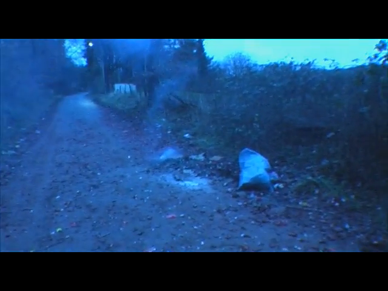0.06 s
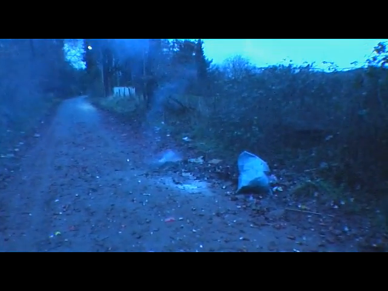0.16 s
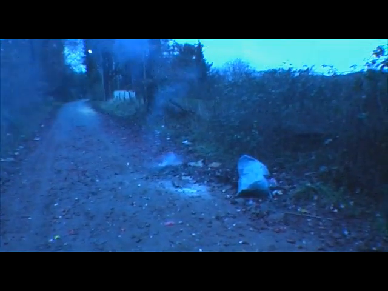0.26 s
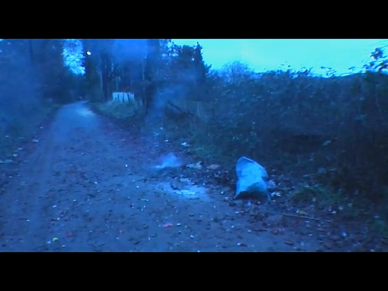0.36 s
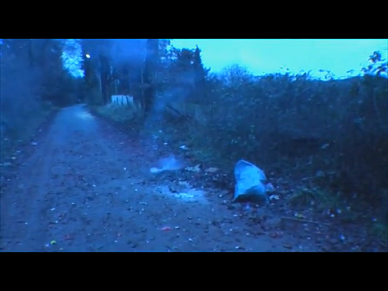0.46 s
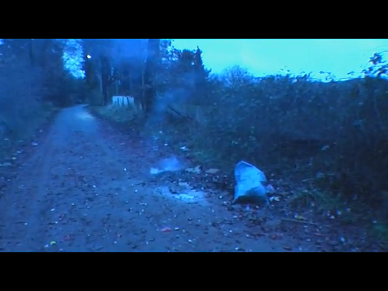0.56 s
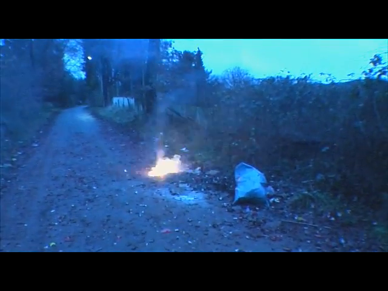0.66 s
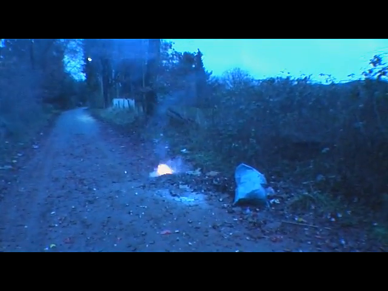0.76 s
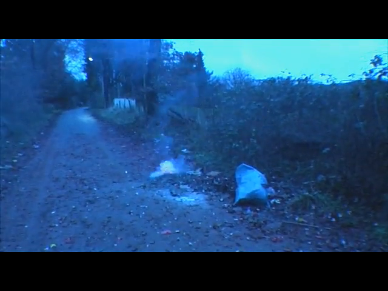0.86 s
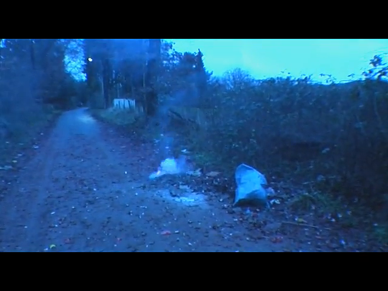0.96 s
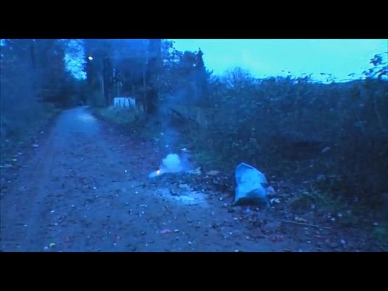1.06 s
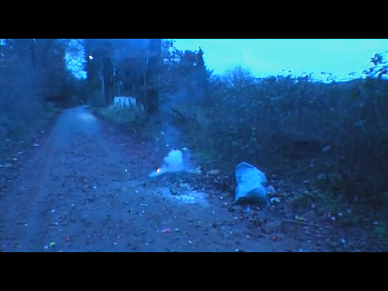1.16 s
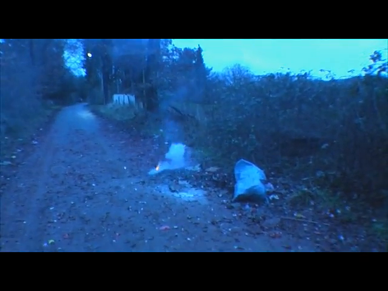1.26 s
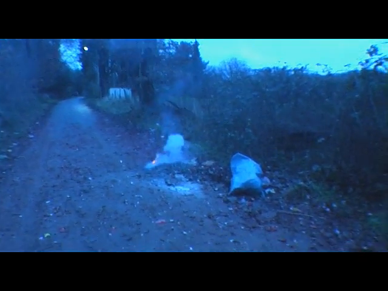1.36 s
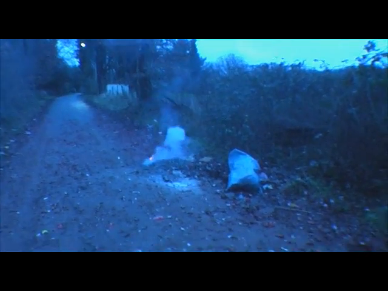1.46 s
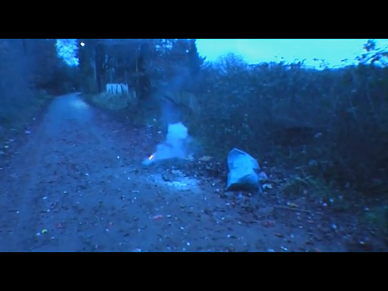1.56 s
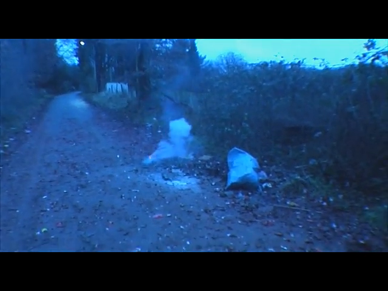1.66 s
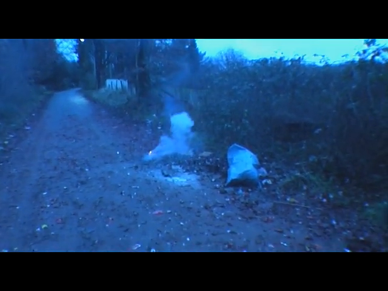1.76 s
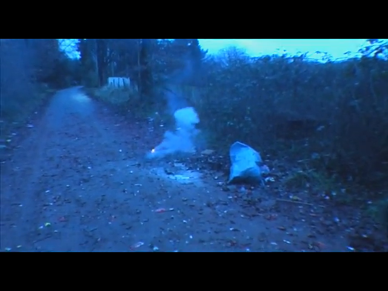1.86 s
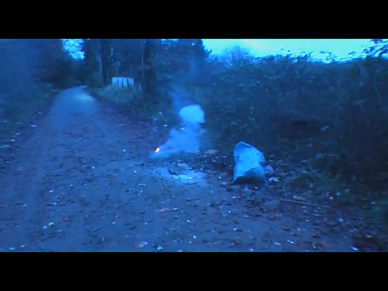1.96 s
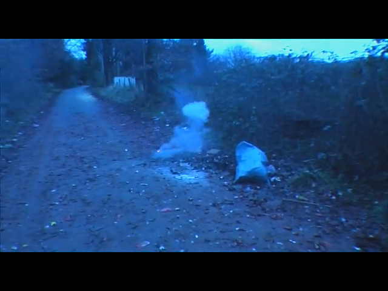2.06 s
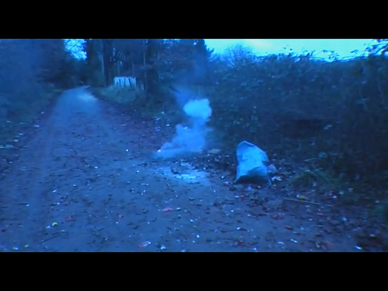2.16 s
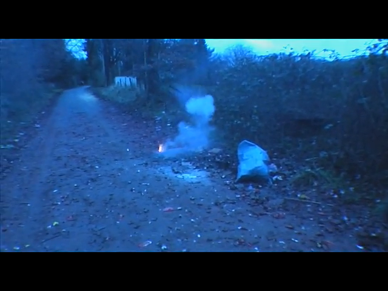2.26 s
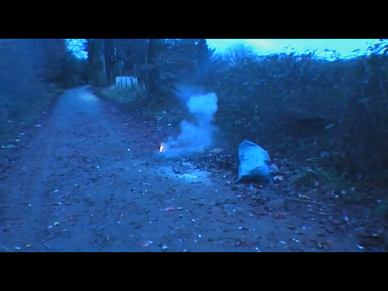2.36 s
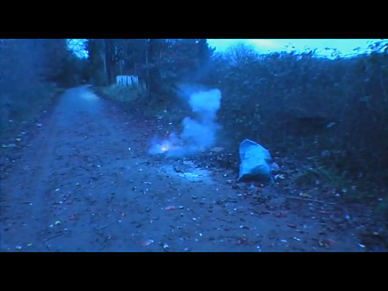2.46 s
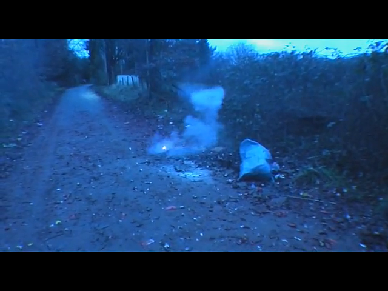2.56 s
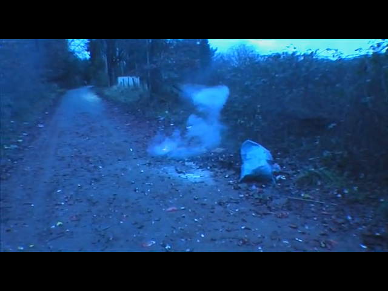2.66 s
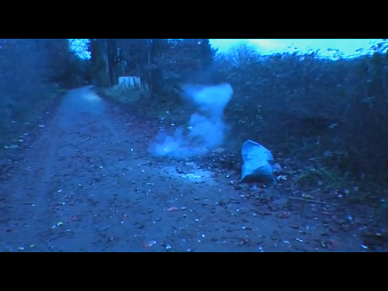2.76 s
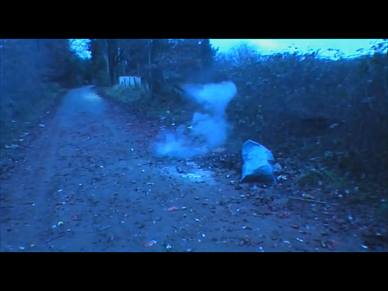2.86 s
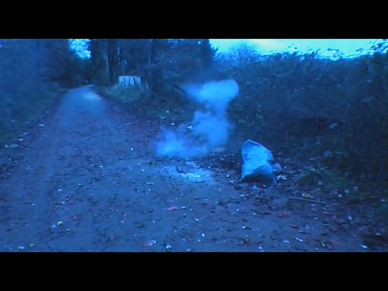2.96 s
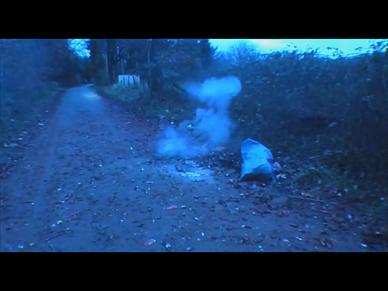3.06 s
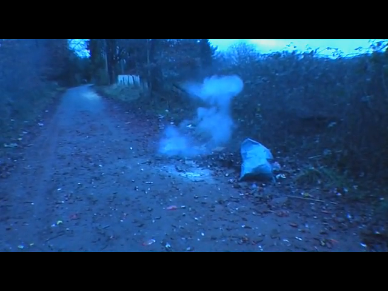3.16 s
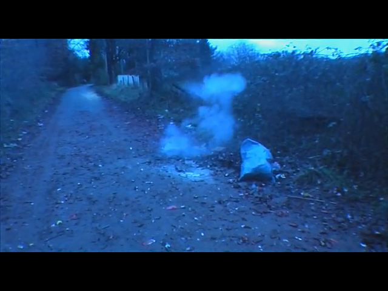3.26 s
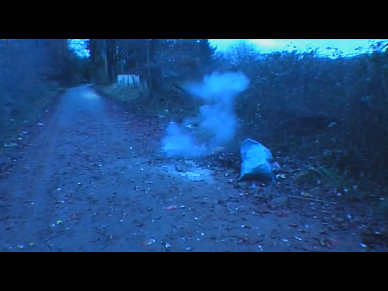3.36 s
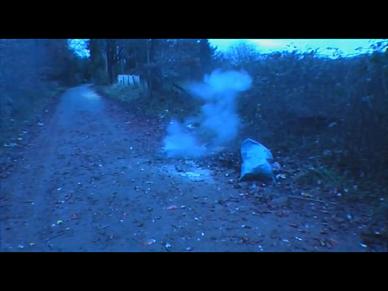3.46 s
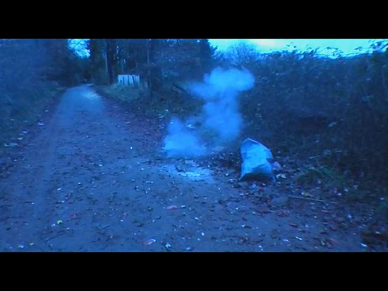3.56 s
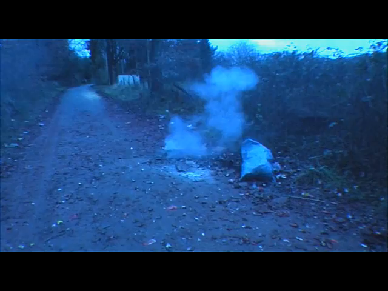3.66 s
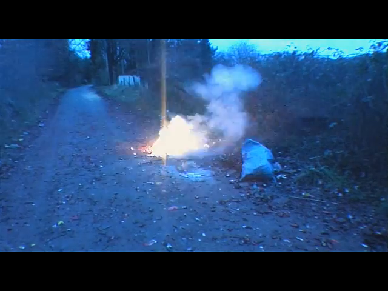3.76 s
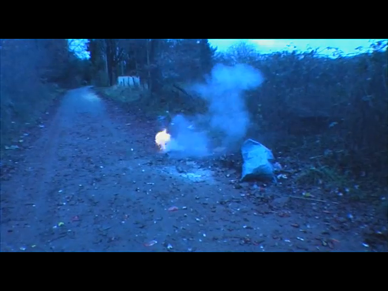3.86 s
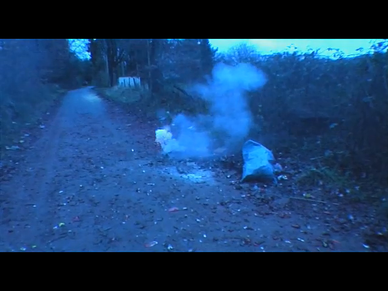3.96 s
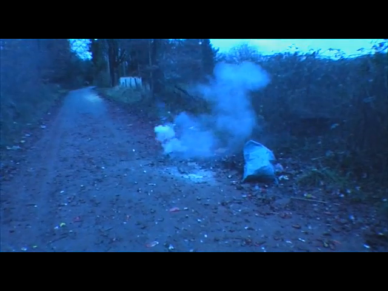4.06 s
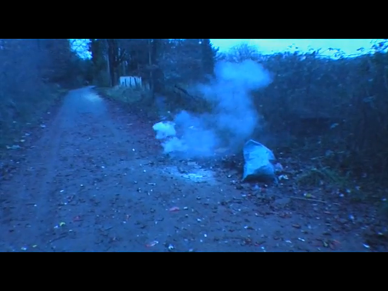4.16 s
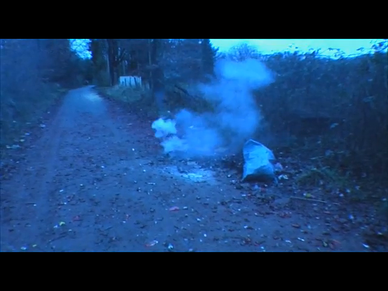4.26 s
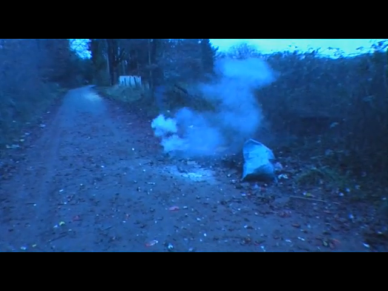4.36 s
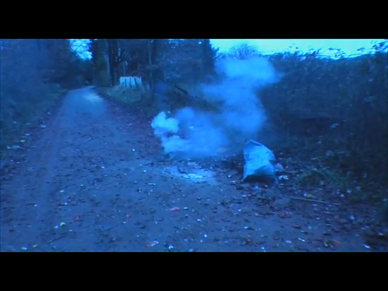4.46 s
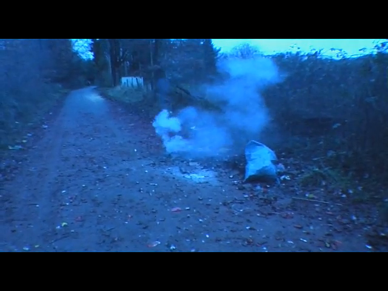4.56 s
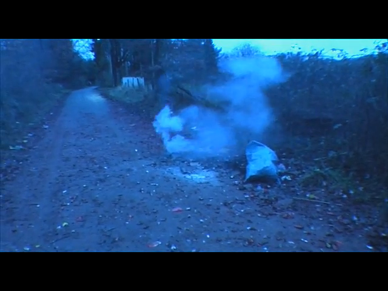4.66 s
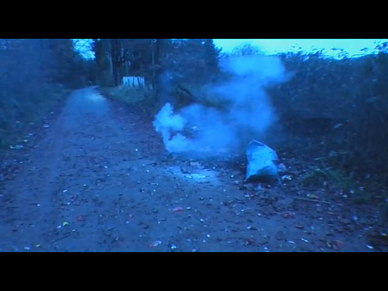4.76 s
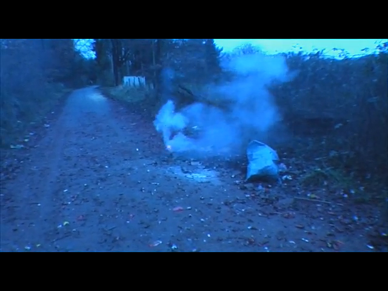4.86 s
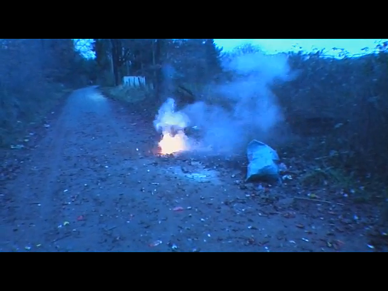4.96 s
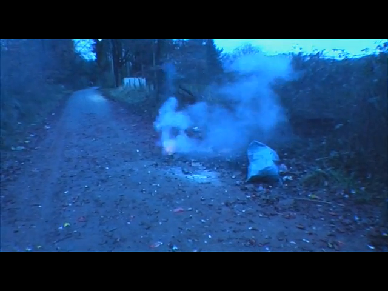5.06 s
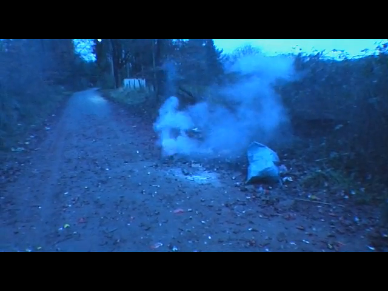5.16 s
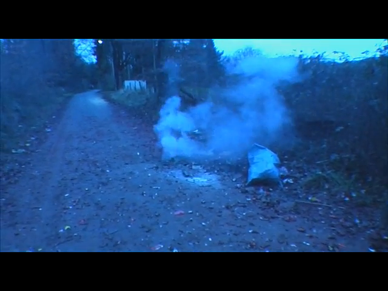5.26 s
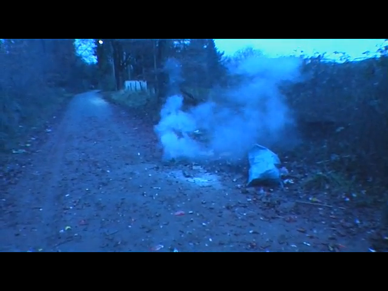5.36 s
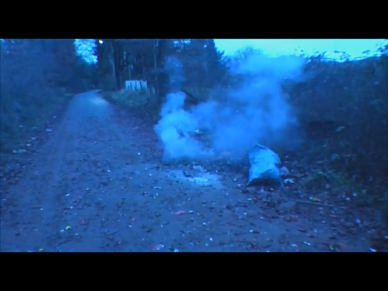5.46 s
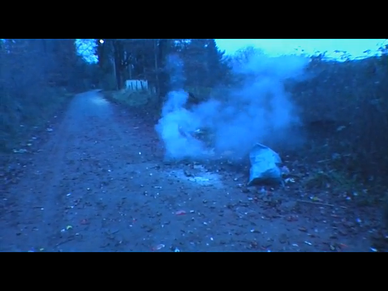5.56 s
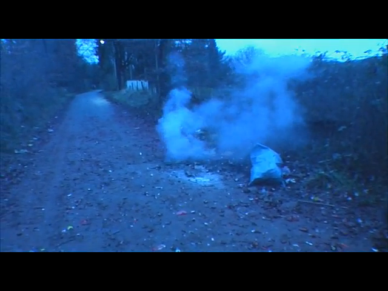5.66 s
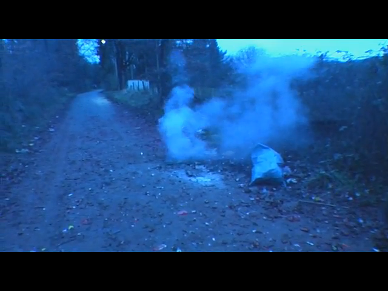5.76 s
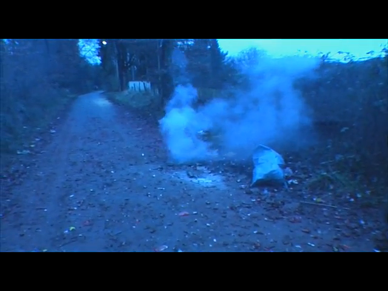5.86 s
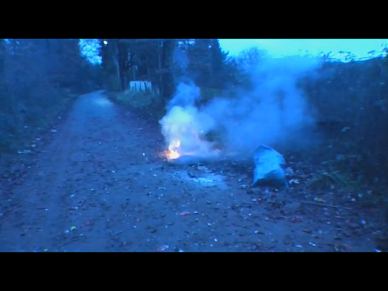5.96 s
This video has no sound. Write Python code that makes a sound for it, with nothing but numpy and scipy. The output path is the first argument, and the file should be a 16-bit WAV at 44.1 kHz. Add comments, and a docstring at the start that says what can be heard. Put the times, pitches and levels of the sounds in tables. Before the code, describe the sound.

A ground firecracker fizzes and pops on a gravel path, going off in four sharp overloaded bangs, each answered by a fading hiss from the trees.

```python
"""A gravel path between trees, where a ground firecracker goes off four times a few metres away.
Each blast is a volley of tiny shocks with a sharp front and a falling thump, and it overloads the input.
Trunks and bushes send it back as a hiss of random clicks that dulls as it fades, with a few distinct returns.
The fuse fizzes as flickering grit, with spits (softer volleys) and pops (short dull pulses).
Behind it all lies a far wash over low wind, made of coloured noise."""
import sys
import numpy as np
from scipy import signal
from scipy.fft import rfft, irfft
from scipy.io import wavfile
from scipy.ndimage import uniform_filter1d

SR = 44100
rng = np.random.default_rng(int(sys.argv[2]) if len(sys.argv) > 2 else 0)


def master_out(mix):
    """Clip the mix to full scale and print it as 16-bit PCM to the path in sys.argv[1]."""
    frames = np.transpose(np.atleast_2d(mix))
    ceiling = np.clip(frames, -1, 1)
    pcm = np.round(ceiling * 32767).astype(np.int16)
    wavfile.write(sys.argv[1], SR, pcm)


N = 265482  # length of the scene [samples]


def amp(db):
    """Turn decibels into an amplitude factor."""
    return 10 ** (np.asarray(db) / 20)


def evened(x):
    """Scale a signal to an rms of 1."""
    return x / np.sqrt(np.mean(x ** 2) + 1e-20)


def read(points, hz):
    """Read a table of (frequency, value) at any frequency, along a logarithmic scale."""
    f, value = np.transpose(points)
    return np.interp(np.log(hz + 1), np.log(f + 1), value)


def add(mix, start_s, sound):
    """Lay a sound into the mix from its start time, cut off at the end of the scene."""
    part = mix[..., round(start_s * SR):][..., :sound.shape[-1]]
    part += sound[..., :part.shape[-1]]


def pair(common, opposite, side_table):
    """Two microphone ports hear one common signal plus an opposite share of another."""
    hz = np.fft.rfftfreq(len(common), 1 / SR)
    mid = rfft(common)
    side = rfft(opposite) * amp(read(side_table, hz))
    return irfft([mid + side, mid - side], len(common))


def colour(x, points, dull_db=0., bass_db=0., bounce_ms=0., share=0.):
    """Shape the spectrum, tilt it about 1 kHz, lift the bass and add the comb of a bounce off the ground."""
    hz = np.fft.rfftfreq(x.shape[-1], 1 / SR)
    tilt_db = -dull_db * np.log2((hz + 50) / 1000)
    shelf_db = bass_db / (1 + (hz / 380) ** 4)
    gain = amp(read(points, hz) + tilt_db + shelf_db)
    bounce = 1 + share * np.exp(-2j * np.pi * hz * bounce_ms / 1000)  # a delayed, weaker copy
    return evened(irfft(rfft(x) * gain * bounce, x.shape[-1]))


def grit(count, per_s, spread_db):
    """Sparse clicks of random sign, a few of them large."""
    where, sign, size = rng.random((count, 3)).T
    clicks = where < per_s / SR
    return clicks * np.sign(sign - .5) * amp(-spread_db * np.log(1 - .995 * size))


def drift(count, low_hz, top_hz):
    """Random wavering of rms 1: a sum of sines between two rates, the slower ones stronger."""
    t = np.arange(count) / SR
    waver = 0
    for f in np.geomspace(low_hz, top_hz, num=24):
        waver = waver + np.sin(2 * np.pi * (f * t + rng.random())) / np.sqrt(f)
    return evened(waver)


LEAD_DB, LEAD_S = -22.5, 0.0035  # a faint quick swell leads into every burst


def burst(row, points, side_table, per_s, spread_db):
    """A volley of small shocks that swells after a faint lead-in, holds and dies; the treble swells later."""
    s, db, rise, hold, t60, dull_db, bass_db = row
    before = .02  # room for the lead-in [s]
    t = np.arange(8192) / SR - before
    swell = np.clip(t / rise, 0, 1)
    fall = amp(-60 * np.maximum(t - rise - hold, 0) / t60)
    lead = amp(LEAD_DB) * np.exp(np.minimum(t, 0) / LEAD_S)
    volley = pair(grit(len(t), per_s, spread_db), grit(len(t), per_s, spread_db), side_table)
    volley = colour(volley, points, dull_db, bass_db)
    low = signal.sosfiltfilt(signal.butter(2, 1600, fs=SR, output="sos"), volley)
    treble = volley - low
    return s - before, amp(db) * fall * (swell ** 1.15 * low + swell ** 8.2 * treble + lead * volley)


def snap(row, cycles, crack_db):
    """A short dull pulse, a sine dying within a few cycles, with a trace of noisy crack on its front."""
    s, db, hz = row
    t = np.arange(600) / SR
    body = np.sin(2 * np.pi * hz * t) * np.exp(-t * hz / cycles) * np.clip(t * hz, 0, 1)
    crack = uniform_filter1d(rng.standard_normal((2, len(t))), size=6) * np.exp(-t / 0.0013)
    return s, amp(db) * (body + amp(crack_db) * crack)


# Spectrum of the far wash and low wind: (frequency [Hz], relative level [dB per Hz])
WASH_COLOUR = [(12, -39), (20, -14), (60, 0), (112, -5), (140, -14.5), (365, -19), (408, -12), (522, -19),
               (599, -9.5), (787, -11.5), (879, -10), (2420, -27), (3650, -31), (7870, -31.5),
               (14000, -44.5)]
WASH_DB = -46.5  # level about which the wash swells [dB]
# Width of the wash, the fuse and its spits: (frequency [Hz], side minus mid [dB])
SIDE_NEAR = [(60, -58), (150, -22), (380, -11), (950, -15), (2370, -7.5), (5950, -13.5), (14900, -1)]


def wash():
    """Far wash over low wind: coloured noise, swelling slowly."""
    air = pair(*rng.standard_normal((N, 2)).T, SIDE_NEAR)
    swelling_db = WASH_DB + 2.1 * drift(N, 0.177, 4.3)
    return amp(swelling_db) * colour(air, WASH_COLOUR)


# Level of the fuse's fizz, before its flicker: (time [s], level [dB])
FUSE_LEVEL = [(0, -58), (.2, -69), (.3, -59), (.44, -55.5), (.57, -48.5), (.64, -53), (.71, -46.5),
              (1.15, -52.5), (1.24, -48), (1.38, -44.5), (1.42, -49), (2.25, -53.5), (2.42, -43.5),
              (2.9, -52.5), (3.649, -54.5), (3.82, -47.5), (4.45, -49.5), (4.93, -54), (4.98, -45.5),
              (5.45, -58), (5.56, -51), (5.98, -49.5), (6.02, -41)]
# Spectrum of the fizz: (frequency [Hz], relative level [dB per Hz])
FUSE_COLOUR = [(1180, -10), (2000, 2.5), (3100, -4.5), (3370, -2.5), (3960, -2), (4200, -2.5), (5100, -1),
               (5530, -3.5), (8110, -2.5), (8800, -8), (10100, -18), (11900, -19.5), (13000, -28),
               (14000, -57)]
# Where the fuse burns between jumps:
# (start time [s], ground bounce delay [ms], bounce share [amplitude ratio], dullness [dB per octave])
FUSE_SPOTS = [(0, 0.68, 0.28, 1), (.75, 0.72, 0.11, -2), (2.5, 0.67, 0.075, 2), (3.86, 0.236, 0.27, 3),
              (5.01, 1.21, 0.24, 3)]


def fuse():
    """Fine grit of burning powder, flickering; its colour changes when the cracker jumps."""
    s, db = np.transpose(FUSE_LEVEL)
    t = np.arange(N) / SR
    fizz = pair(grit(N, 8000, 3.1), grit(N, 9000, 0.6), SIDE_NEAR)
    spot = np.searchsorted([row[0] for row in FUSE_SPOTS[1:]], t)  # which spot it burns at, moment by moment
    heard = 0
    for k, (_, ms, share, dull_db) in enumerate(FUSE_SPOTS):
        heard = heard + (spot == k) * colour(fizz, FUSE_COLOUR, dull_db, bounce_ms=ms, share=share)
    flickering_db = np.interp(t, s, db) + 1.64 * drift(N, 8, 60)
    return amp(flickering_db) * heard


# Spits of the fuse: (time [s], level [dB], rise [s], hold [s], time to fall 60 dB [s],
# dullness [dB per octave], bass lift [dB])
SPITS = [(0.222, -44, 0.0054, 0.01, 0.24, 1.5, 6), (0.459, -33.5, 0.0037, 0.027, 0.12, 2.5, -1),
         (0.497, -32, 0.0059, 0.016, 0.15, 3.5, -2.5), (2.291, -26, 0.002, 0.0073, 0.16, 4, 4),
         (2.416, -32, 0.028, 0.072, .05, 0.5, 10)]
# Spectrum of a spit: (frequency [Hz], relative level [dB per Hz])
SPIT_COLOUR = [(59, -31), (100, -2.5), (209, -13), (303, -6.5), (1170, 3), (1440, 0), (1600, 0.5),
               (2360, -5.5), (7760, 1), (12400, -12.5), (13500, -11)]


def spits(mix):
    """The fuse spits: volleys of dense grit, all of nearly even size."""
    for row in SPITS:
        add(mix, *burst(row, SPIT_COLOUR, SIDE_NEAR, per_s=12000, spread_db=0.5))


# Small pops of the fuse: (time [s], level before the pulse dies away [dB], pitch [Hz])
POPS = [(0.193, -36, 883), (0.34, -16, 1300), (0.5204, -3, 840), (2.299, -8.5, 700), (3.653, -35, 851),
        (5.654, -13, 1040), (5.958, -19.5, 855)]


def pops(mix):
    """The fuse pops: dull pulses that die in a cycle or so."""
    for row in POPS:
        add(mix, *snap(row, cycles=0.63, crack_db=-27))


NEAR_S = 0.25  # the excess of the near returns dies away over this time [s]


def returned_db(late, db, fall_db, near_db):
    """Level of the scattered sound, late seconds after the bang: a steady fall plus near returns."""
    return db - fall_db * late + near_db * np.exp(-late / NEAR_S)


# Sound coming back from the trees after each bang, and the bounce where the cracker lay:
# (bang time [s], level [dB], fall [dB per s], excess of near returns [dB], ground bounce delay [ms],
# bounce share [amplitude ratio], dullness [dB per octave], bass lift [dB], factor on path loss [ratio])
SCATTER = [(.728, -18, 31, 3, 0.66, 0.026, 1, -10.5, 0.86),
           (2.484, -21, 60, 2, 1.03, 0.05, -0.93, 3.5, 0.81),
           (3.838, -19.5, 29, 2.5, 0.91, 0.02, 0.5, -9, 0.86),
           (4.992, -21.5, 42.5, 7.5, 1.62, .35, 0.05, 1.5, 0.92)]
# Spectrum of the returns: (frequency [Hz], relative level [dB per Hz])
SCATTER_COLOUR = [(35, -25), (60, -11), (381, -7), (457, -6), (808, -6), (1110, -5), (1500, -6),
                  (1680, -7.5), (2010, -9.5), (2420, -12.5), (6750, -16), (13100, -34), (14000, -55)]
# Air and leaves swallow the treble on long paths: (frequency [Hz], extra loss before the factor [dB per s])
PATH_LOSS = [(80, -6), (250, 5), (1000, 1), (2700, 14.5), (5400, 44.5), (8000, 56), (11000, 85),
             (13500, 210)]
# Lean of the returns to one side: (frequency [Hz], left minus right [dB])
TREES_BALANCE = [(60, 24), (180, 4.5), (550, -2), (1640, -1), (4950, 1.5), (14900, -2)]
# Width of the returns: (frequency [Hz], side minus mid [dB])
SIDE_TREES = [(60, -27), (110, -33), (200, -39), (380, -21), (700, -21.5), (1290, -14), (2370, -7),
              (4380, -10.5), (8080, -4), (11500, 1), (14900, -14)]
# Groups of large trunks that answer every bang:
# (delay [s], swell of the scatter [dB], single return over the scatter [dB], pitch of that return [Hz])
TRUNKS = [(.058, -1.5, 12.5, 1116), (.089, 3, 2, 866), (.116, 2, 7.5, 794), (0.187, 1, 2, 1360),
          (.283, 3, 8, 1480), (.413, 4, 7.5, 775), (.465, 3, 9, 715), (.497, -4, 9, 950),
          (.745, 3.5, 8.5, 860)]
TRUNKS_SPREAD_S = 0.0082  # how far a group's swell spreads either side of its delay [s]
FIRST_RETURN_S, SWELL_S = .022, 0.014  # the nearest bushes answer first [s]
SCATTER_S = 1.1  # length of the returns [s]
HOP = 64  # step of the time-frequency grid [samples]


def scatter(row):
    """Thousands of trunks and bushes return the blast as clicks; the later, the duller."""
    s, db, fall_db, near_db, bounce_ms, share, dull_db, bass_db, loss = row
    t = FIRST_RETURN_S + np.arange(0, SCATTER_S, 1 / SR)  # time since the bang
    returns = pair(grit(len(t), 12000, 1.3), grit(len(t), 12000, 1.3), SIDE_TREES)
    returns = colour(returns, SCATTER_COLOUR, dull_db, bass_db, bounce_ms, share)
    hz, late, z = signal.stft(returns, SR, nperseg=4 * HOP, noverlap=3 * HOP)
    side_db = read(TREES_BALANCE, hz)[:, None] * np.array([.5, -.5])[:, None, None]

    # groups of trunks, each with its own colour
    patches = rng.standard_normal((len(late), len(hz))).T
    patches = uniform_filter1d(patches, size=2, axis=0)
    patches_db = 1.44 * evened(uniform_filter1d(patches, size=120, axis=1))

    path_db = -loss * read(PATH_LOSS, hz)[:, None] * (late - 0.0759)
    z = z * amp(side_db + patches_db + path_db)
    dulled = signal.istft(z, SR, nperseg=4 * HOP, noverlap=3 * HOP)[1][:, :len(t)]

    clumps_db = 0.85 * drift(len(t), 13.84, 60.36)
    for delay, swell_db, _, _ in TRUNKS:
        clumps_db = clumps_db + swell_db * np.exp(-((t - delay) / TRUNKS_SPREAD_S) ** 2)
    fade = np.clip((t - t[0]) / SWELL_S, 0, 1) * np.clip((t[-1] - t) / 0.088, 0, 1)
    return s + t[0], amp(returned_db(t, db, fall_db, near_db) + clumps_db) * fade * dulled


def echoes(row):
    """Each group of large trunks sends one distinct return: rows of (time, level, pitch) for a snap."""
    rows = []
    for delay, _, over_db, hz in TRUNKS:
        rows.append((row[0] + delay, returned_db(delay, *row[1:4]) + over_db, hz))
    return rows


def trees(mix):
    """The trees answer each bang with a scattered hiss and a few distinct returns."""
    for row in SCATTER:
        add(mix, *scatter(row))
        for echo in echoes(row):
            add(mix, *snap(echo, cycles=3.2, crack_db=-36.5))


# Falling thump after each blast: (time [s], starting level [dB], pitch it falls towards [Hz],
# length [s], fade [dB per s], starting level of the knock [dB])
THUMPS = [(.7315, -14, 30, 0.074, 6, -42), (2.491, -16, 48, 0.067, 220, -27),
          (3.842, -18.5, 45, 0.077, 120, -21), (4.9955, -12, 46.3, 0.072, 220, -11)]
THUMP_FIRST_HZ, THUMP_GLIDE_S, THUMP_RISE_S, THUMP_END_S = 200, 0.0107, 0.0013, .012
KNOCK_HZ, KNOCK_T60 = 162.7, 0.13  # short low ring under every blast: pitch [Hz], time to fall 60 dB [s]
THUMP_BALANCE_DB = [[.45], [-.45]]  # a little louder on the left: left, right [dB]


def thump(row):
    """The slow swing of pressure after the shock: a few cycles of falling pitch over a short knock."""
    s, db, last_hz, length, fade_db, knock_db = row
    t = np.arange(0, length, 1 / SR)
    hz = last_hz + (THUMP_FIRST_HZ - last_hz) * np.exp(-t / THUMP_GLIDE_S)
    shape = np.clip(np.minimum(t / THUMP_RISE_S, (length - t) / THUMP_END_S), 0, 1)
    swing = amp(db - fade_db * t) * np.sin(2 * np.pi * np.cumsum(hz) / SR)
    knock = amp(knock_db - 60 * t / KNOCK_T60) * np.sin(2 * np.pi * KNOCK_HZ * t)
    return s, amp(THUMP_BALANCE_DB) * shape * (swing + knock)


def thumps(mix):
    """Every blast pushes out one thump."""
    for row in THUMPS:
        add(mix, *thump(row))


# The first large swings of each shock front: (time [s], level before the pulse dies away [dB], pitch [Hz])
FRONTS = [(.7306, 1.5, 648), (2.487, -2, 370), (3.839, 5.5, 622), (4.9935, -8, 690)]


def fronts(mix):
    """Each shock front is a strong pulse of a few swings."""
    for row in FRONTS:
        add(mix, *snap(row, cycles=2.1, crack_db=-26))


# The four blasts: (time [s], level [dB], rise [s], hold [s], time to fall 60 dB [s],
# dullness [dB per octave], bass lift [dB])
BLASTS = [(0.7285, -6, 0.00081, 0.022, 0.053, 0.5, -14.5), (2.471, 0, 0.015, 0.003, 0.075, -0.55, -4),
          (3.837, 0.5, 0.0044, 0.0066, 0.055, -0.5, -7), (4.988, -5, 0.0048, 0.016, 0.084, -0.5, -3.5)]
# Spectrum of a blast: (frequency [Hz], relative level [dB per Hz])
BLAST_COLOUR = [(88, -44), (150, 4.5), (701, 1), (936, -2), (1400, -0.5), (1770, -4), (2230, -4),
                (3470, -8.5), (7350, -8), (12100, -17), (15000, -4)]
# Width of a blast: (frequency [Hz], side minus mid [dB])
SIDE_BLAST = [(60, -23), (120, -36), (240, -22), (470, -15), (950, -20), (1890, -13), (3760, -15),
              (7490, -11.5), (11000, -5), (14900, -9)]


def blasts(mix):
    """The cracker goes off: loud volleys of small shocks, some much larger than others."""
    for row in BLASTS:
        add(mix, *burst(row, BLAST_COLOUR, SIDE_BLAST, per_s=7000, spread_db=3.0))


def scene():
    """All sounds together, from the far background to the blasts."""
    mix = wash() + fuse()
    for source in (spits, pops, trees, thumps, fronts, blasts):
        source(mix)
    return mix


# Top treble rolled off before the overload: (frequency [Hz], gain [dB])
TOP_ROLLOFF = [(12600, -1.5), (13300, -18), (13900, -32)]
EDGE_HZ = 15520  # upper band limit


def record(dry):
    """The top treble is rolled off; the input overloads with a firm knee; then the band limit."""
    knee, ceiling = 6., .97  # sharpness of the overload, largest amplitude before the band limit
    hz = np.fft.rfftfreq(N, 1 / SR)
    rolled_off = irfft(rfft(dry) * amp(read(TOP_ROLLOFF, hz)), N)
    clipped = rolled_off / (1 + abs(rolled_off / ceiling) ** knee) ** (1 / knee)
    band_limit = signal.firwin(511, EDGE_HZ, window=("kaiser", 9), fs=SR)
    return signal.oaconvolve(clipped, band_limit[None], "same")


dry = scene()
out = record(dry)
master_out(out)
```